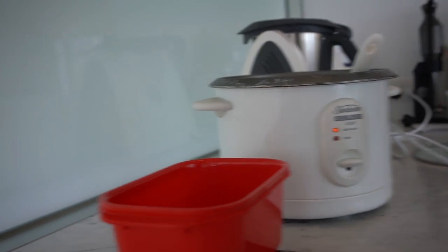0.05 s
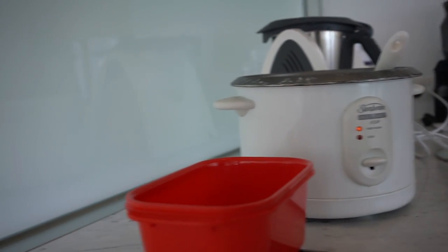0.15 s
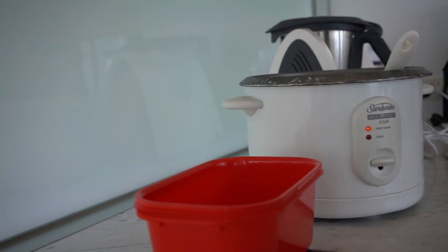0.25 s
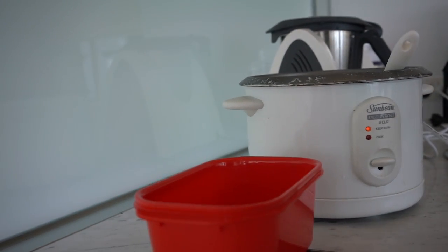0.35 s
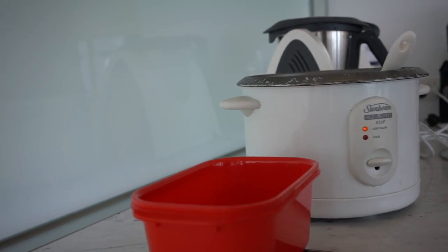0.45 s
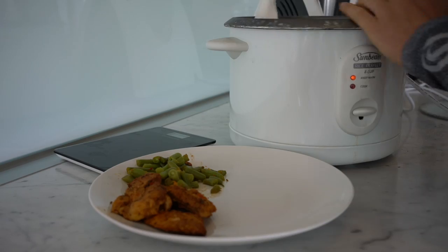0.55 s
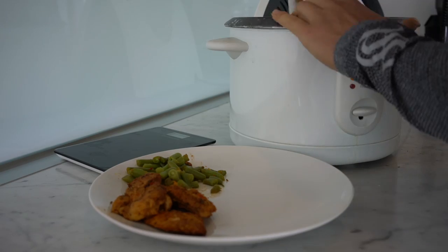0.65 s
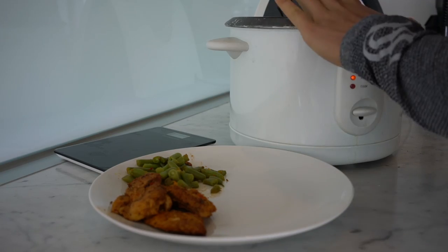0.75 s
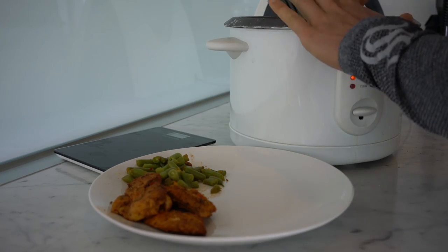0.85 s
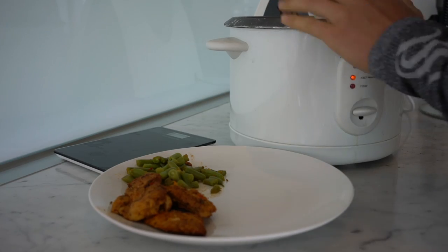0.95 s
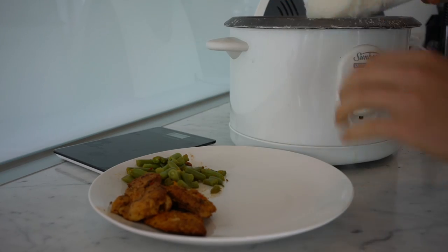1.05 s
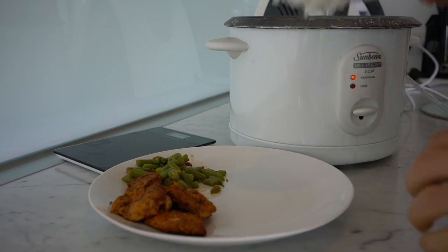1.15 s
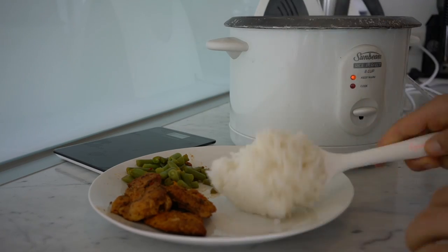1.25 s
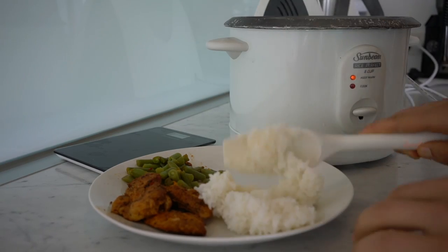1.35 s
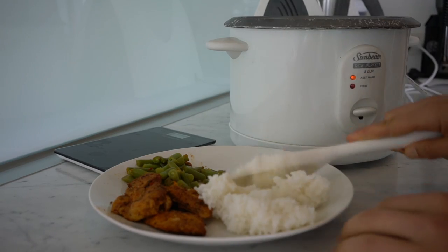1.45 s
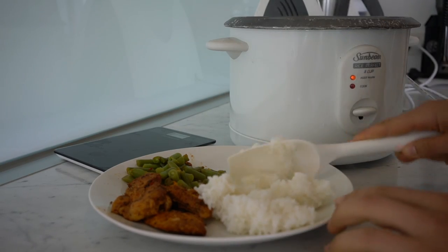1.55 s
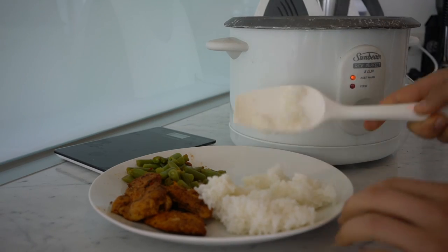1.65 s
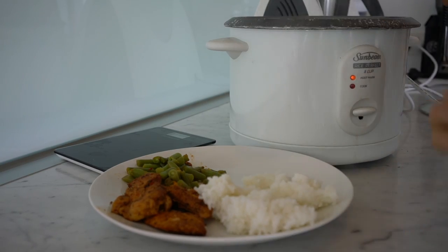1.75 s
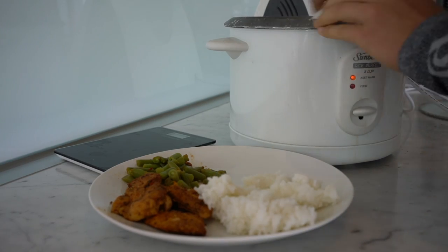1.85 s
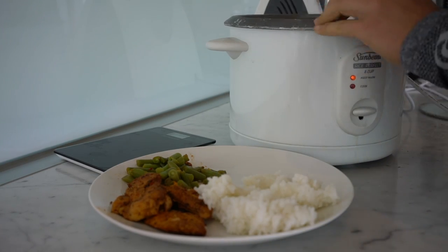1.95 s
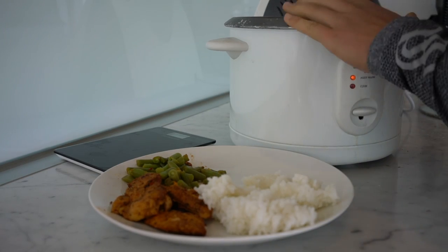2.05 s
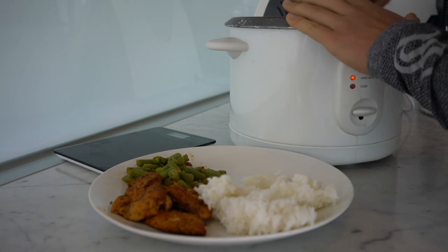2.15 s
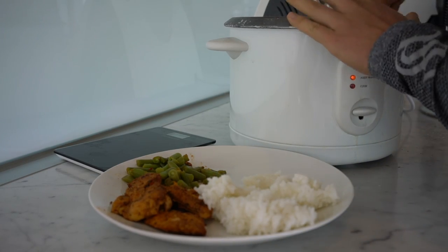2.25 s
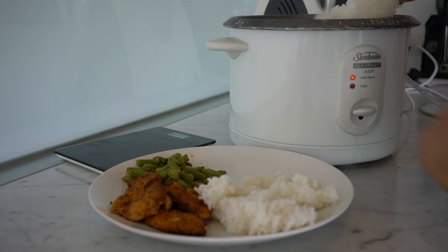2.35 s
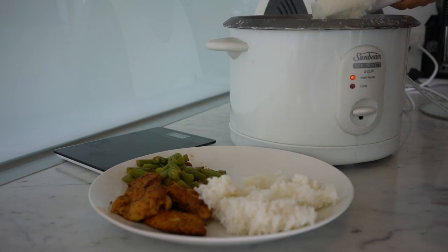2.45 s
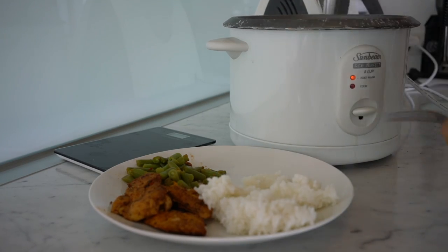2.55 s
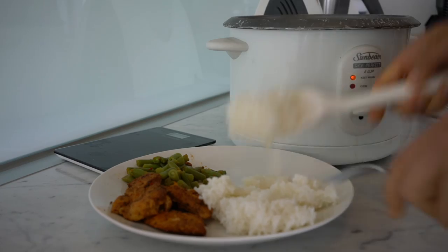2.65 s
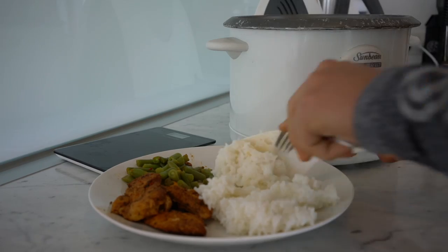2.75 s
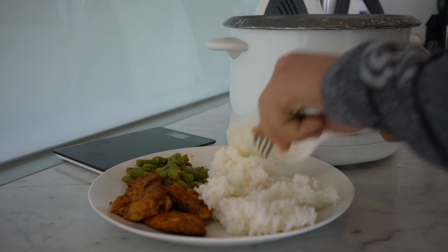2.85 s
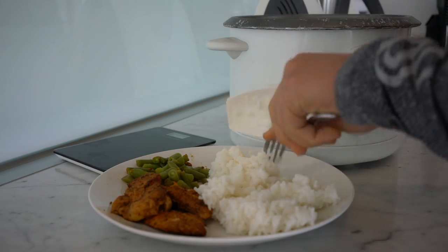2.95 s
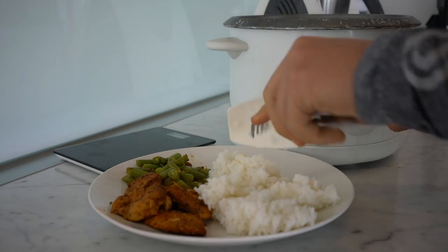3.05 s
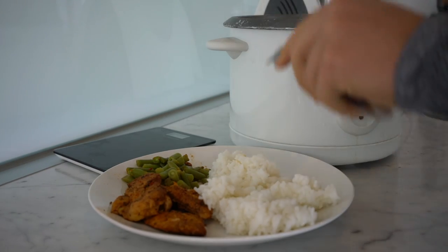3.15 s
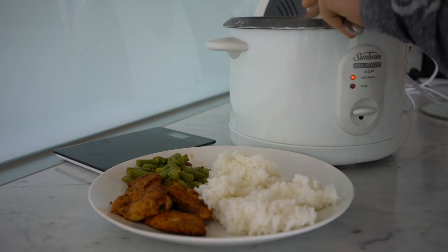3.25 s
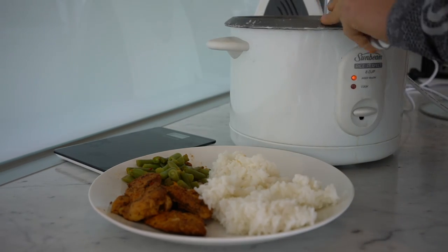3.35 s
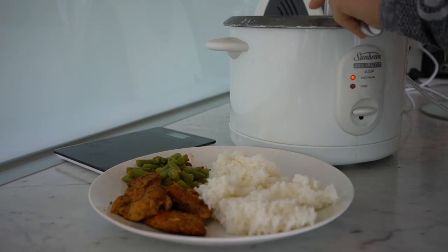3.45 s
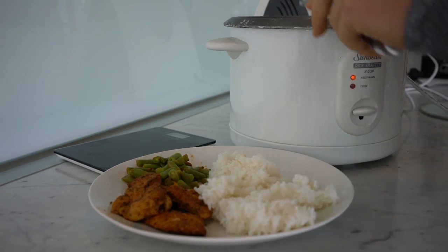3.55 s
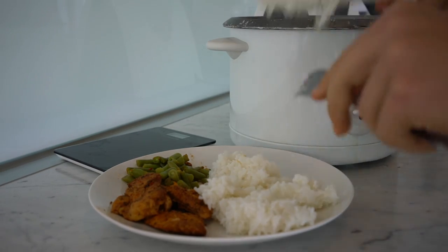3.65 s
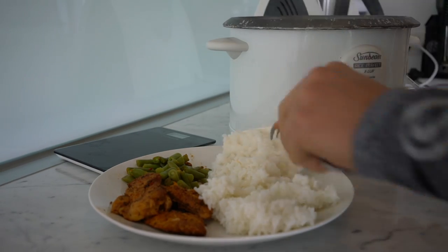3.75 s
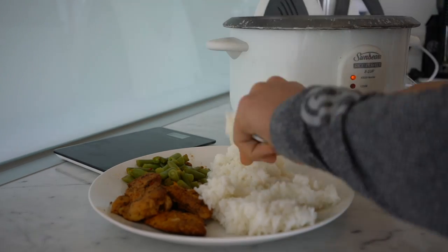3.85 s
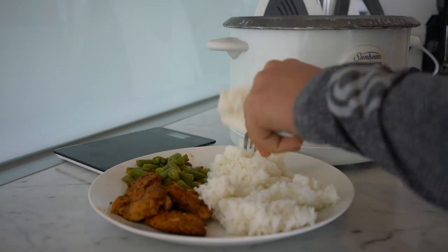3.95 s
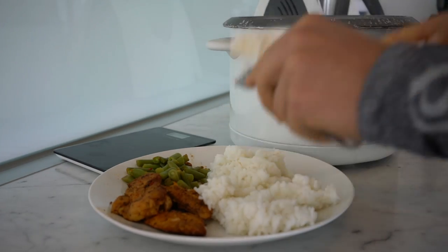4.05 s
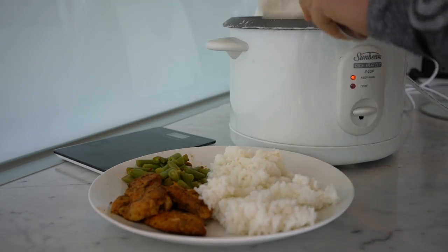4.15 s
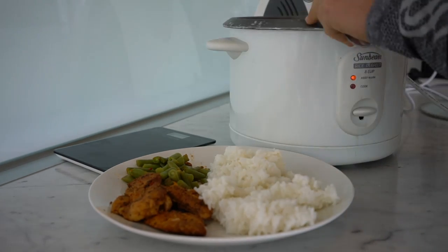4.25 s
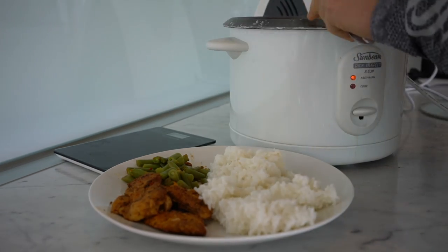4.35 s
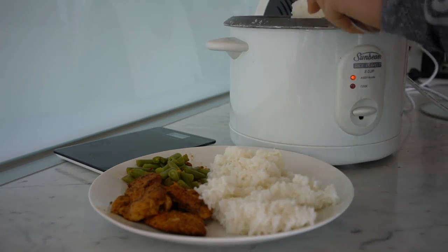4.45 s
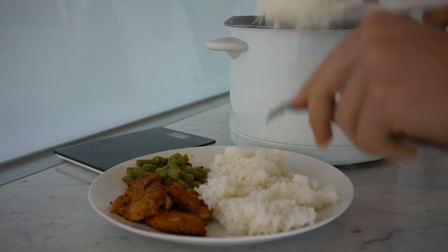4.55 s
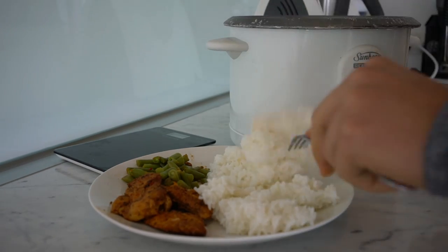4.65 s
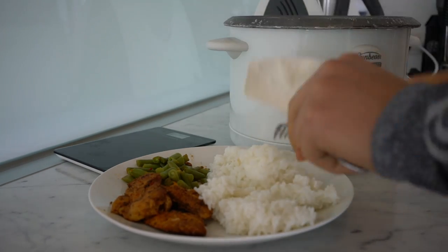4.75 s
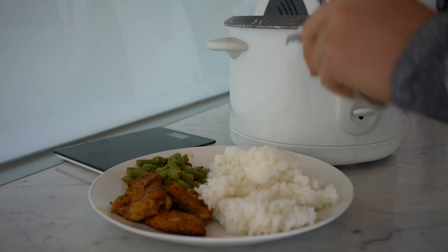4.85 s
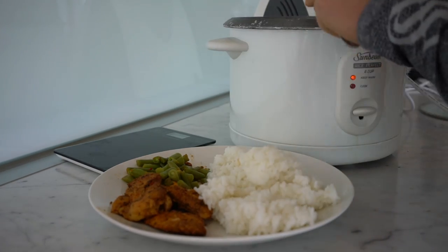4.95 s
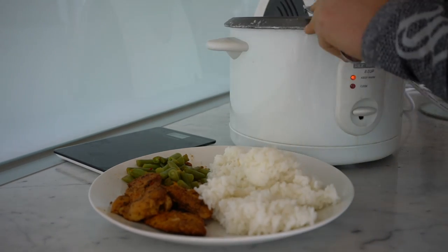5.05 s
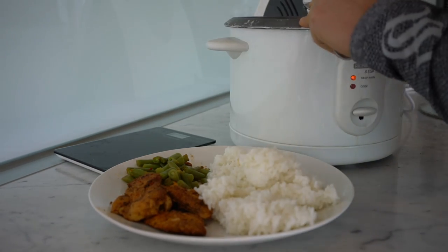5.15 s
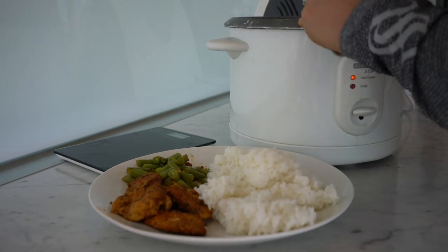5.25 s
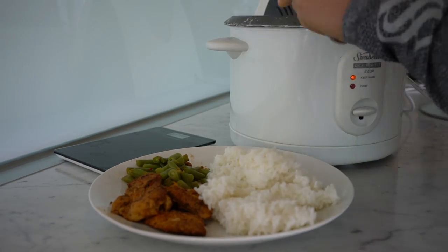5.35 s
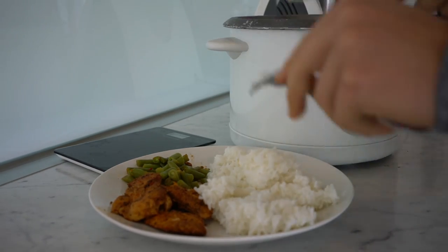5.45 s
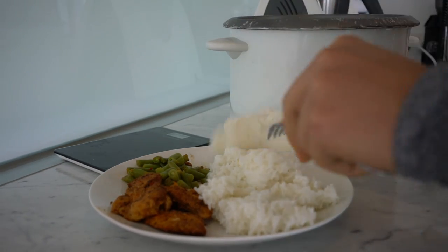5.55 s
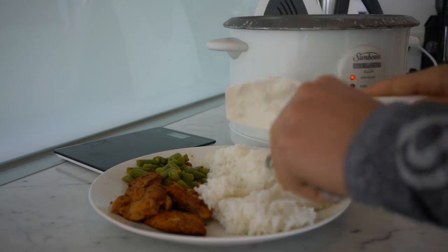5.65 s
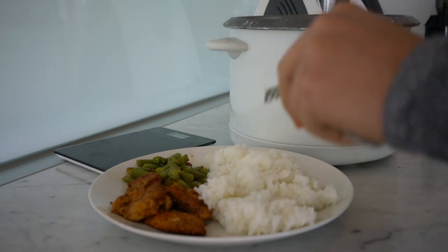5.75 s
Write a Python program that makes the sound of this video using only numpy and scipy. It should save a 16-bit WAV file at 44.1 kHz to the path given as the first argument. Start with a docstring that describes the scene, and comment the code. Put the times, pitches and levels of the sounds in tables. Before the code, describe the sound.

A brief low rumble of a hand on the microphone comes first, over a steady kitchen hum. Close by, a spoon digs into a rice cooker five times, each a short cluster of hollow knocks and scrapes. Moist rice crackles softly between scoops. After the first, the spoon taps quickly against a plate; later a fork scratches it, and near the end it grazes the metal pot. The room is slightly reverberant.

```python
"""A low rumble comes first, as a hand rubs and rocks the camera it holds, over a kitchen's steady hum.
Close by, a spoon digs cooked rice out of a rice cooker five times. Each stroke bumps, sticks and slips,
driving the resonances of the pot into a hollow clatter, and the moist rice fizzes as it parts.
The spoon is shaken off against a plate and later cleared with a fork; near the end it grazes the
pot's metal liner. The kitchen's hard walls add a short reverberation."""
import sys
import numpy as np
from scipy import signal
from scipy.fft import rfft, irfft, next_fast_len
from scipy.io import wavfile
from scipy.ndimage import map_coordinates

SR = 44100
rng = np.random.default_rng(int(sys.argv[2]) if len(sys.argv) > 2 else 0)


def output_pcm(signal):
    """Save a mono or channel-first signal as 16-bit PCM at the path in sys.argv[1].

    Samples are clipped to [-1, 1] before scaling.
    """
    pcm = np.clip(np.atleast_2d(signal).T, -1, 1) * 32767
    wavfile.write(sys.argv[1], SR, np.round(pcm).astype(np.int16))


N = 255969

# Shifts of the hand on the camera. Each row: start in seconds, length in seconds, level in dB.
HAND_SHIFTS = [(-0.04, 0.19, -16), (0.202, 0.22, -30.5), (0.462, 0.06, -15)]
# Spectra of the noises. Each row: frequency in Hz, relative level in dB.
RUMBLE_SPECTRUM = [(15, -18), (35, 27), (55, 8), (100, 2), (150, -14), (200, -4), (320, -39), (800, -62)]  # the camera body moving
RUB_SPECTRUM = [(150, -42), (250, -10), (379, -11.5), (544, 0.5), (1010, -11), (1670, -7), (2530, -14),
                (3900, -20.5), (9590, -24.5), (10500, -30), (15600, -39)]  # the hand rubbing it
KITCHEN_SPECTRUM = [(12, -27), (20, 3.5), (70, -10.5), (112, -19), (176, -8.5), (333, -16.5), (465, -17.5),
                    (520, -18.5), (987, -17.5), (1420, -23), (2040, -21.5), (2340, -28), (2620, -23.5),
                    (7970, -31.5), (15600, -40)]  # the steady background
DRONE_SPECTRUM = [(15, -9), (30, -2), (46, 4.5), (62, -3), (85, -9), (128, -10), (170, -8), (260, -23),
                  (900, -47)]  # the building's murmur
FIZZ_SPECTRUM = [(150, 4), (250, -3.5), (470, 6.5), (900, 1), (1200, 2.5), (2600, 4.5), (5000, 1.5),
                 (8700, 1.5), (10300, -5), (13500, -4.5), (15700, -12)]  # moist rice settling
TICK_SPECTRUM = [(600, -4), (1500, 4), (4000, 5.5), (9000, 6), (16000, -7)]  # bright ticks and clicks
RASP_SPECTRUM = [(500, 2.5), (950, 4), (1500, 0.5), (2200, 1), (3500, -10.5), (5000, -11.5), (9000, -59)]  # the spoon rubbing
CRUNCH_SPECTRUM = [(1500, -11), (3500, -1), (4500, 0), (6000, -3.5), (8600, 0), (10200, -10), (13500, -9.5),
                   (16000, -26)]  # rice tearing
# Drift of the building's drone. Each row: time in seconds, level in dB.
DRONE_LEVELS = [(0.7, -43), (0.95, -51.5), (1.6, -45.5), (2.2, -49), (3.3, -49.5), (4.1, -47.5),
                (4.3, -45.5), (5.1, -48), (5.4, -57)]
# Loosened heaps of rice. Each row: start in seconds, length in seconds, level in dB.
RICE_HEAPS = [(0.542, 0.3, -31), (0.95, 0.71, -35.5), (1.685, 0.64, -41), (2.253, 1.5, -39),
              (3.55, 0.81, -43), (4.53, 0.072, -42.5), (4.873, 0.42, -44.5), (5.422, 0.21, -49)]
# Short bright clicks: rice clumps snapping, and the spoon's sharp ticks on the plate.
# Each row: time in seconds, relative level in dB.
BRIGHT_CLICKS = [(1.225, -33.5), (1.2523, -31.5), (1.3255, -33.5), (1.535, -33.5), (1.625, -33),
                 (1.6771, -34), (2.519, -33), (2.7632, -32.5), (3.069, -41.5), (3.112, -40.5),
                 (3.25, -39.5), (3.8347, -39.5), (3.8592, -37.5), (4.7187, -39), (4.824, -45),
                 (4.8569, -44), (4.8772, -42), (5.3096, -39), (5.646, -45)]
# Strokes of the spoon. Each row: start in seconds, length in seconds, pot level in dB,
# pot centre in Hz, wall scrape level in dB, rice crunch level in dB.
SPOON_STROKES = [(0.613, 0.044, -29, 434, -31.5, -58), (0.66, 0.078, -29, 440, -34.5, -29.5),
                 (0.72, 0.0069, -21, 397, -19.5, -44), (0.771, 0.076, -32, 390, -29.5, -29),
                 (0.872, 0.029, -33.5, 640, -25, -29), (0.979, 0.017, -36, 464, -52, -46),
                 (1.057, 0.0056, -29, 640, -53, -43), (1.936, 0.042, -17.5, 416, -26, -26.5),
                 (1.983, 0.013, -18.5, 494, -17.5, -35), (2.028, 0.014, -22.5, 530, -26, -40),
                 (2.068, 0.075, -17, 410, -26.5, -32), (2.168, 0.098, -37.5, 402, -38.5, -37),
                 (2.255, 0.013, -34, 530, -52, -60), (2.342, 0.036, -20.5, 400, -31, -59),
                 (2.549, 0.03, -37.5, 560, -39.5, -66), (3.323, 0.059, -17, 340, -25, -32),
                 (3.404, 0.017, -21.5, 440, -24.5, -38.5), (3.49, 0.033, -29.5, 426, -27.5, -42.5),
                 (3.537, 0.014, -26, 444, -48, -49), (3.613, 0.035, -21.5, 386, -33.5, -39.5),
                 (4.269, 0.052, -19, 417, -25, -36), (4.357, 0.045, -28.5, 446, -31.5, -44.5),
                 (4.44, 0.0075, -18.5, 590, -25.5, -47), (4.716, 0.016, -58, 520, -43, -39),
                 (5.005, 0.057, -19.5, 393, -28.5, -34), (5.082, 0.013, -18.5, 444, -32, -60),
                 (5.114, 0.035, -19.5, 370, -29.5, -35), (5.177, 0.022, -18.5, 390, -26.5, -32),
                 (5.289, 0.011, -29, 430, -52, -58), (5.365, 0.017, -24.5, 483, -38, -53),
                 (5.443, 0.009, -36.5, 480, -55, -50), (5.484, 0.0068, -38, 330, -50, -51)]
# Resonances of the cooker. Each row: frequency in Hz, bandwidth in Hz, relative level in dB.
POT_MODES = [(124, 107, -13), (167.6, 61, -10), (259, 63, -2), (304, 53, 2), (338, 37, 1.5), (463, 58, 2.5),
             (509, 110, -3), (624, 84, -5.5), (690, 26, -5), (757.6, 62, -8)]  # the pot in its housing
WALL_MODES = [(1184, 56, 8), (1264, 60, -6), (1692, 42, 5), (2060, 67, 1), (2500, 1600, -17),
              (3280, 350, -7.5), (3210, 130, -53), (4160, 44, -15.5)]  # its thin wall
# The spoon bumping the pot. Each row: time in seconds, pot level in dB, contact hardness in dB.
POT_BUMPS = [(0.6227, -19, -23), (0.727, -28, 4), (0.737, -15, -12), (1.0598, -27, -5), (1.9445, -13, -17),
             (2.0775, -26, -1), (2.337, -19, -11), (3.338, -13.5, -12.5), (3.405, -38, -4),
             (3.486, -16.5, -14), (3.614, -33, 5), (4.278, -39, -18), (4.296, -7.5, -20),
             (4.453, -15.5, -4.5), (5.020, -20, -14), (5.1165, -32, 11), (5.4862, -23.5, -18)]
# Squeals on the wall. Each row: time and half-width in seconds, pitch in Hz, relative level in dB.
WALL_SQUEALS = [(1.063, 0.0045, 1800, -29), (2.006, 0.0034, 4200, -19.5), (2.044, 0.0041, 4200, -24.5),
                (2.367, 0.017, 1770, -33.5), (3.412, 0.011, 4160, -24), (3.511, 0.0079, 1800, -26),
                (3.907, 0.011, 3320, -35.5), (4.365, 0.013, 4230, -33.5), (4.451, 0.0058, 1700, -46)]
# The spoon striking the plate and rebounding. Each row: time in seconds, relative thump level in dB,
# thump frequency in Hz, relative clack level in dB.
PLATE_TAPS = [(1.494, -22, 170, -36), (1.5353, -12.5, 117, -18), (1.546, -19.5, 208, -21),
              (1.5789, -14, 152, -19.5), (1.5945, -12, 144, -36), (1.627, -12, 146, -22),
              (1.6719, -8, 124, -24.5)]
# Freely ringing modes. Each row: frequency in Hz, relative level in dB, 60 dB decay time in seconds.
PLATE_MODES = [(880, 2, 0.018), (1584, 6, 0.019), (2250, -11, 0.053), (3230, -11, 0.036),
               (3620, -13, 0.056), (4200, -8, 0.053), (6250, -22, 0.042)]
FORK_MODES = [(1410, -21, 0.034), (1930, -6, 0.061), (3122, 14.5, 0.041), (4080, -1, .05), (5240, -13, .04),
              (6300, 1, 0.049), (7060, 6, 0.046), (8650, 6, 0.046), (11800, 0, .028), (13100, -9, .032)]
LINER_MODES = [(1127, 8.5, 0.071), (1656, -3.5, 0.18), (2170, 8, 0.09), (2290, 1.5, 0.077),
               (3350, 0.5, 0.039), (4520, -17, 0.066), (5300, -15, 0.082)]
# Glancing metal contacts. Each row: time and half-width in seconds, relative level in dB,
# share of clean tap from 0 to 1.
FORK_GRAZES = [(2.518, 0.015, -39, 0), (2.897, 0.0013, -28, 0.73), (2.922, 0.0017, -50, 0.2)]  # fork on spoon
LINER_GRAZES = [(5.363, 0.0055, -25.5, 0.25), (5.644, 0.0039, -41, 0.64)]  # spoon on the pot's liner
# Reverberation of the kitchen. Each row: frequency in Hz, 60 dB decay time in seconds.
ROOM_DECAY = [(150, 0.21), (1000, 0.4), (10000, 0.11)]


def amp(db):
    """Amplitude ratio of a level in dB."""
    return 10 ** (np.asarray(db) / 20)


def rms(x):
    """Root-mean-square amplitude."""
    return np.sqrt(np.mean(x ** 2) + 1e-20)


def unit(x):
    """Normalisation to rms 1."""
    return x / rms(x)


def clock():
    """Time in seconds at each sample."""
    return np.arange(N) / SR


def along(points, hz):
    """Interpolation of (Hz, value) points on a logarithmic frequency axis."""
    freqs, values = np.transpose(points)
    return np.interp(np.log(hz + 1), np.log(freqs), values)


def filtered(x, response):
    """Linear filtering: the spectrum of x times a frequency response."""
    size = next_fast_len(len(x) + 8192)
    return irfft(rfft(x, size) * response(np.fft.rfftfreq(size, 1 / SR)), size)[:len(x)]


def coloured(x, spectrum):
    """Spectral shaping by a (Hz, dB) curve, at rms 1."""
    return unit(filtered(x, lambda hz: amp(along(spectrum, hz))))


def resonated(x, modes):
    """Forced response of parallel resonators of alternating polarity, at rms 1."""
    def response(f):
        return sum((-1) ** k * amp(db) * 1j * f * width / (hz * hz - f * f + 1j * f * width)
                   for k, (hz, width, db) in enumerate(modes))
    return unit(filtered(x, response))


def grains(size, per_s, spread_db):
    """Shot noise: tiny slips of random time and strength, at rms 1."""
    occurs = rng.random(size) < per_s / SR
    direction = np.sign(rng.standard_normal(size))
    strength = amp(spread_db * np.clip(rng.standard_normal(size), -2, 2))
    return unit(occurs * direction * strength)


def ring(modes, t):
    """Free vibration: damped sinusoids, each of slightly random strength."""
    return sum(amp(db + rng.normal(0, 0.57) - 60 * t / t60) * np.sin(2 * np.pi * hz * t)
               for hz, db, t60 in modes)


def swell(t, length, rise_s, sag, fall):
    """Envelope: a smooth rise, a slow sag and, after its length, a fall (both in dB per second)."""
    onset = np.sin(np.pi / 2 * np.clip(t / rise_s, 0, 1)) ** 2
    return onset * amp(-sag * np.maximum(t, 0) - fall * np.maximum(t - length, 0))


def add(track, start_s, sound):
    """Superposition of a sound on the track."""
    part = track[max(round(start_s * SR), 0):][:len(sound)]
    part += sound[:len(part)]


def hand_rumble():
    """Structure-borne sound: the hand rubs the camera, rocks it at each shift, then lets go."""
    rocking_hz, let_go_s = 12.0, 0.592
    grip_rub_db, shift_rub_db = -48.5, -33.5
    shifts = sum(amp(db) * swell(clock() - start, length, rise_s=0.057, sag=0, fall=280)
                 for start, length, db in HAND_SHIFTS)
    waver = resonated(rng.standard_normal(N), [(5.4, 7.2, 0)])
    rocking = np.sin(2 * np.pi * np.cumsum(rocking_hz * (1 + 0.19 * waver)) / SR)
    rumble = 1.32 * rocking + 0.72 * coloured(rng.standard_normal(N), RUMBLE_SPECTRUM)
    rub = coloured(grains(N, per_s=3000, spread_db=5), RUB_SPECTRUM)
    held = np.clip((let_go_s - clock()) / 0.0064, 0, 1)
    return held * (rumble * shifts + rub * (amp(grip_rub_db) + amp(shift_rub_db) * shifts))


def background():
    """Ambient noise: the kitchen's is stationary, while the building's low drone drifts in level."""
    kitchen = amp(-49.0) * coloured(rng.standard_normal(N), KITCHEN_SPECTRUM)
    drift = amp(np.interp(clock(), *np.transpose(DRONE_LEVELS)))
    return kitchen + drift * coloured(rng.standard_normal(N), DRONE_SPECTRUM)


def rice_parting():
    """Failure of adhesion: wet grains fizz and tick as each heap settles."""
    settling = sum(amp(db) * swell(clock() - start, length, rise_s=0.22, sag=10.5, fall=80)
                   for start, length, db in RICE_HEAPS)
    fizz = coloured(grains(N, per_s=20000, spread_db=3), FIZZ_SPECTRUM)
    ticks = coloured(grains(N, per_s=90, spread_db=4.5), TICK_SPECTRUM)
    return settling * (fizz + amp(-10) * ticks)


def pot_modes(centre_hz):
    """Modal weighting: the contact favours the pot's low or high modes."""
    tilt = 30 * np.log(centre_hz / 420)
    return [(hz, width, db + tilt * np.log(max(hz, 220) / 420)) for hz, width, db in POT_MODES]


def spoon_strokes():
    """Stick-slip friction: each juddering stroke shakes the pot, rasps on its wall and tears the rice."""
    judder_db, judder_per_s = 1.85, 116
    pot_lead_s = 0.007  # the spoon leans on the pot just before it scrapes
    out = np.zeros(N)
    t = np.arange(SR // 3) / SR
    for start, length, pot_db, centre_hz, scrape_db, crunch_db in SPOON_STROKES:
        wander = map_coordinates(rng.standard_normal(128), [t * judder_per_s])
        judder = unit(amp(judder_db * wander))
        push, rub, tear = (judder * swell(t, length, rise_s=0.016, sag=72, fall=fall)
                           for fall in (407, 454, 480))
        slips = grains(len(t), per_s=2000, spread_db=3.5)
        pot = resonated(push * slips, pot_modes(centre_hz))
        wall = resonated(rub * slips, WALL_MODES)
        rasp = coloured(rub * grains(len(t), per_s=4500, spread_db=2.5), RASP_SPECTRUM)
        crunch = coloured(tear * grains(len(t), per_s=4000, spread_db=3), CRUNCH_SPECTRUM)
        add(out, start - pot_lead_s, amp(pot_db) * rms(push) * pot)
        add(out, start, amp(scrape_db) * rms(rub) * (0.41 * wall + 0.8 * rasp))
        add(out, start, amp(crunch_db) * rms(tear) * crunch)
    return out


def pot_bumps():
    """Impulse response of the pot: a harder contact gives more of its high modes, wall and click."""
    out = np.zeros(N)
    t = np.arange(SR // 6) / SR
    impulse = 1.0 * (t == 0)
    for start, db, hardness_db in POT_BUMPS:
        pot = resonated(impulse, pot_modes(centre_hz=540 + 9.5 * hardness_db))
        wall = resonated(impulse, WALL_MODES)
        ringing = pot / np.abs(pot).max() + amp(hardness_db) * wall / np.abs(wall).max()
        click = coloured(rng.standard_normal(len(t)), CRUNCH_SPECTRUM) * amp(-60 * t / 0.035)
        add(out, start, amp(db) * (ringing + amp(-13 + 1.6 * hardness_db) * click))
    return out


def wall_squeals():
    """Friction-excited resonance: fast stick-slip locks onto one narrow band for a moment."""
    out = np.zeros(N)
    t = np.arange(-SR // 12, SR // 12) / SR
    for peak_s, half_width, hz, db in WALL_SQUEALS:
        envelope = np.exp(-(t / half_width) ** 2)
        tone = resonated(rng.standard_normal(len(t)) * envelope, [(hz, 380, 0)])
        add(out, peak_s + t[0], amp(db - 3.8) * rms(envelope) * tone)
    return out


def bright_clicks():
    """Broadband transients: rice clumps snap, and the spoon ticks sharply on the plate."""
    t60_s = 0.038
    out = np.zeros(N)
    t = np.arange(SR // 12) / SR
    for start, db in BRIGHT_CLICKS:
        crackle = grains(len(t), per_s=21000, spread_db=15.5) * amp(-60 * t / t60_s)
        add(out, start, 0.19 * amp(db) * coloured(crackle, TICK_SPECTRUM))
    return out


def plate_knocks():
    """Impact excitation: the loaded spoon thumps the plate on the counter and makes its modes clack."""
    out = np.zeros(N)
    t = np.arange(SR // 4) / SR
    thump_envelope = (1 - np.exp(-t / 0.00039)) * amp(-60 * t / 0.06)
    for start, thump_db, hz, clack_db in PLATE_TAPS:
        thump = -np.sin(2 * np.pi * hz * t) * thump_envelope
        crack = coloured(rng.standard_normal(len(t)), RASP_SPECTRUM) * amp(-60 * t / 0.087)
        clack = 0.39 * ring(PLATE_MODES, t) + 0.26 * crack
        add(out, start, 0.83 * amp(thump_db) * thump + amp(clack_db) * clack)
    return out


def metal_grazes(touches, modes, scratch_db):
    """Impact and sliding friction: metal on metal gives a dry scratch and leaves the modes ringing."""
    scratch_spectrum = [(500, 11), (1400, 17), (3000, 14), (9000, 3), (13000, 2), (16000, -19)]
    out = np.zeros(N)
    t = np.arange(-SR // 20, SR // 4) / SR
    for peak_s, half_width, db, tap_share in touches:
        slips = grains(len(t), per_s=8700, spread_db=13.0) * np.exp(-(t / half_width) ** 2)
        force = (1 - tap_share) * slips / np.linalg.norm(slips) + tap_share * (t == 0)
        ringing = unit(signal.fftconvolve(force, ring(modes, t - t[0]))[:len(t)])
        scratch = amp(scratch_db) * coloured(slips, scratch_spectrum)
        gain = amp(db) * np.sqrt((half_width + 0.0032) / (t[-1] - t[0]))  # longer contact, more energy
        add(out, peak_s + t[0], gain * (tap_share ** 0.21 * ringing + (1 - tap_share) * scratch))
    return out


def reverberation(x):
    """Diffuse reflection from hard walls: a short tail whose decay time depends on frequency."""
    hz, t, noise = signal.stft(rng.standard_normal(SR // 2), SR, nperseg=256)
    decay = amp(-60 * t / along(ROOM_DECAY, hz)[:, None])
    tail = signal.istft(noise * decay, SR, nperseg=256)[1]
    delayed = np.pad(x, (SR // 200, 0))
    return signal.fftconvolve(delayed, tail / np.linalg.norm(tail))[:N]


def scene():
    """Superposition of the serving sounds, their reverberation, the background and the hand's rumble."""
    liner = metal_grazes(LINER_GRAZES, LINER_MODES, scratch_db=-20)
    fork = metal_grazes(FORK_GRAZES, FORK_MODES, scratch_db=4.5)
    spoon = spoon_strokes() + pot_bumps() + wall_squeals() + plate_knocks()
    serving = spoon + fork + liner + rice_parting() + bright_clicks()
    return (serving + amp(-17) * reverberation(serving) + background() + hand_rumble())[None]


def record(dry):
    """Band limiting: the camera passes nothing above its cutoff."""
    cutoff_hz = 15750
    return filtered(dry[0], lambda hz: hz < cutoff_hz)[None]


dry = scene()
out = record(dry)
output_pcm(out)
```